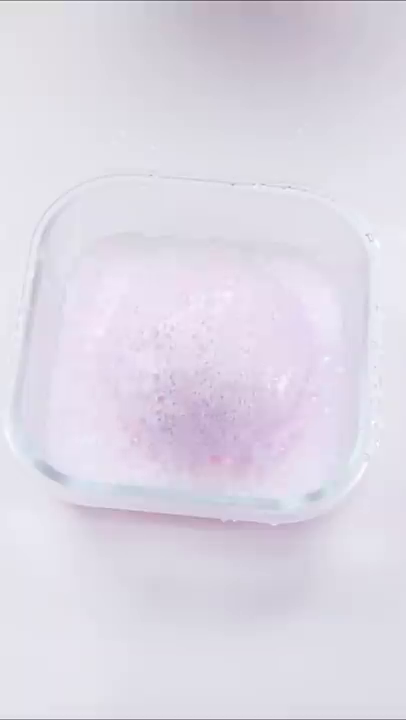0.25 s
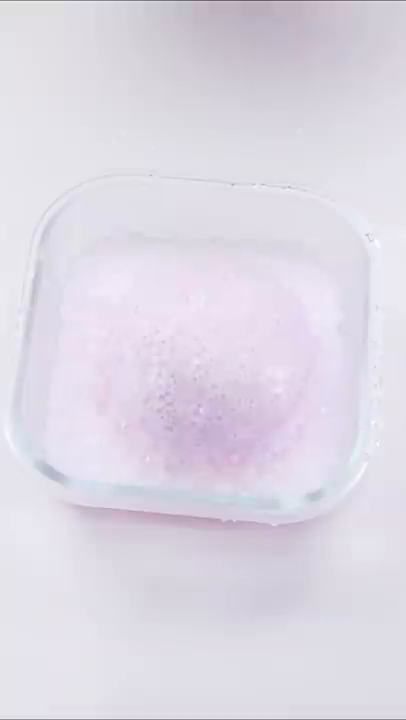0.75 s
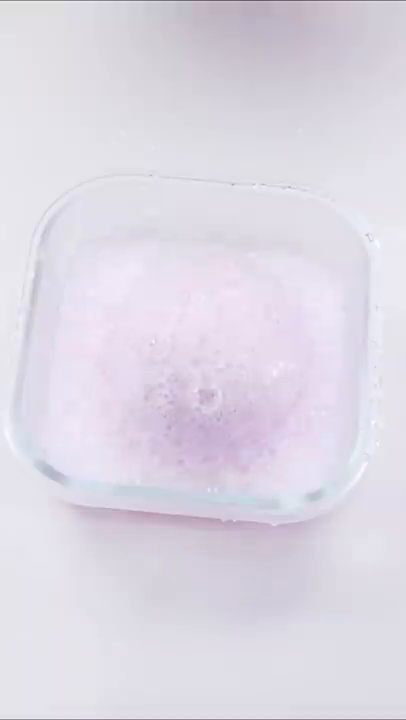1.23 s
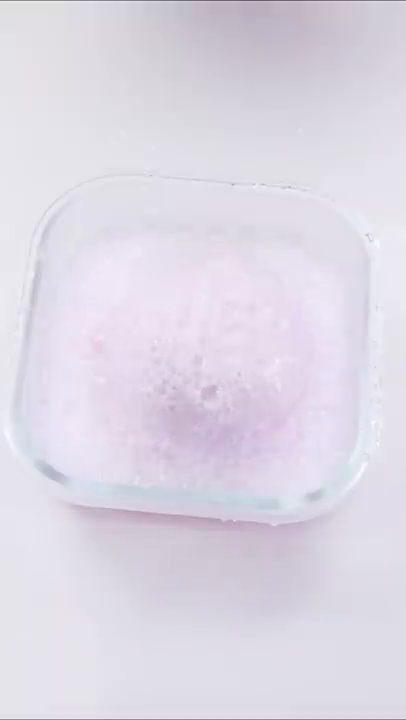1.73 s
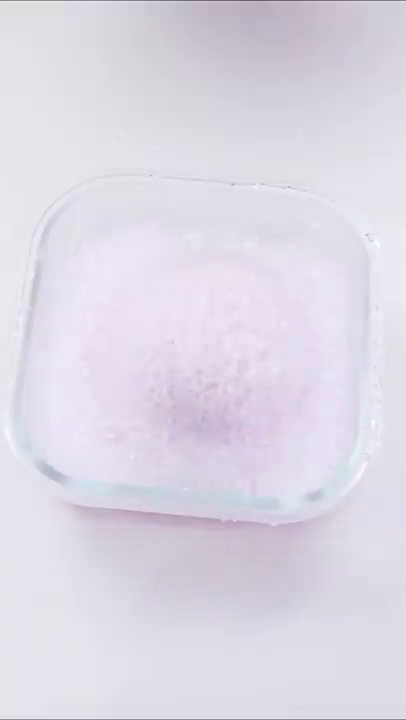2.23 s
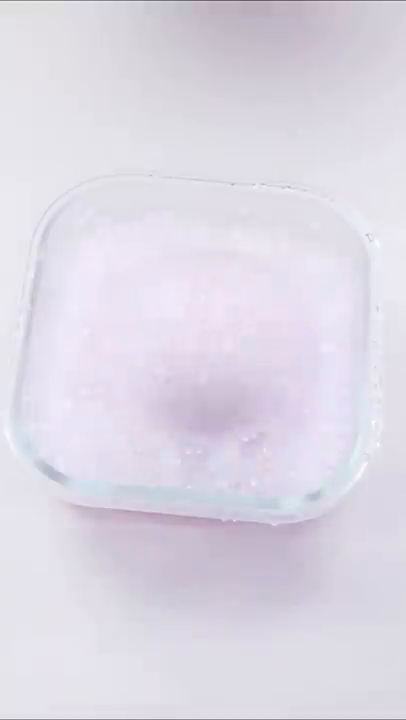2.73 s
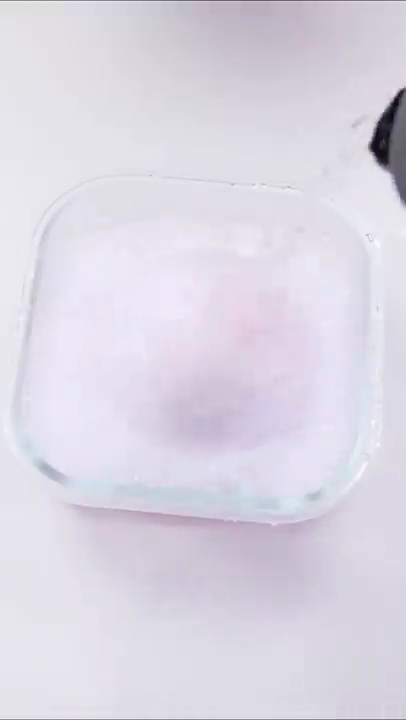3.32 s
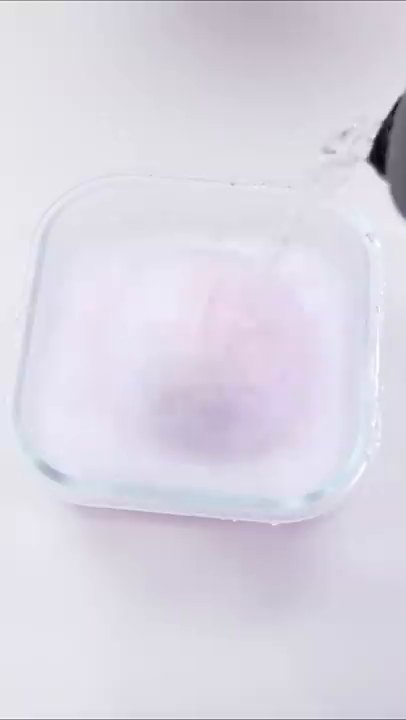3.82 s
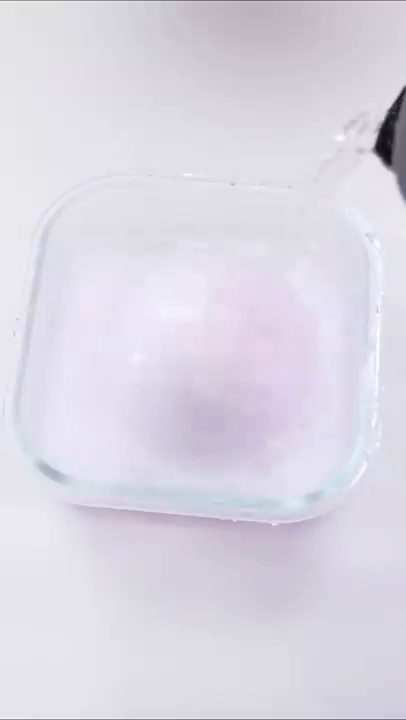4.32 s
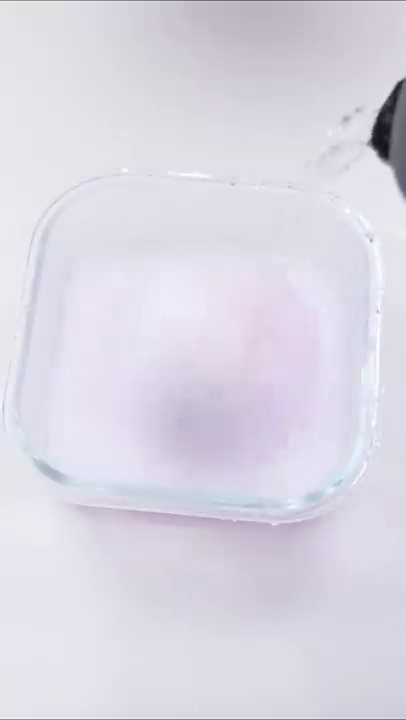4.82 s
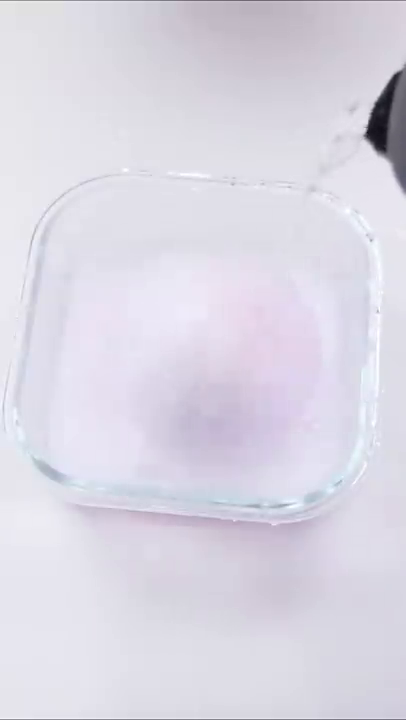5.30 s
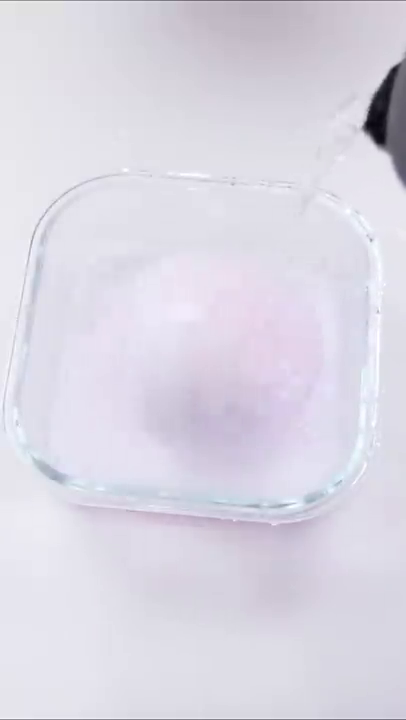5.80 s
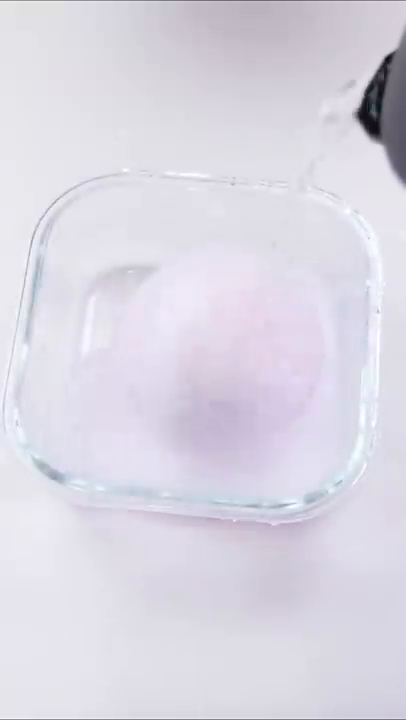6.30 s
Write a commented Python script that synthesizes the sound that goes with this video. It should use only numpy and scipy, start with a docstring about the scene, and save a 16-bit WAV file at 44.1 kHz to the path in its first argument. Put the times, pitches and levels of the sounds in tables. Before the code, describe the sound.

Close, bright, steady effervescent hiss with fine crackle swelling for three seconds, then a thin stream of water landing and gurgling quietly underneath.

```python
"""A bath bomb fizzes in a glass dish while water is poured over it, heard close up in stereo.
Swarms of tiny bubble bursts make the hiss and the crackling foam, whose voice sinks as it thickens.
Larger bubbles ring as a burble, higher as the stream runs on, over a low churning that gulps as it lands.
A few single pops and soft knocks, made of decaying tones, stand above a faint rumble of filtered noise."""
import sys
import numpy as np
from scipy import signal
from scipy.fft import rfft, irfft
from scipy.io import wavfile
from scipy.ndimage import uniform_filter1d

SR = 44100
rng = np.random.default_rng(int(sys.argv[2]) if len(sys.argv) > 2 else 0)


def write(x):
    x = np.atleast_2d(x).T
    wavfile.write(sys.argv[1], SR, np.round(np.clip(x, -1, 1) * 32767).astype(np.int16))


N = 288850
FRAME_S = np.arange(N // 256 + 8) * 256 / SR
BIN_HZ = np.fft.rfftfreq(1024, 1 / SR)[:, None]

# relative spectrum of the finest bubbles' hiss: freq_hz, density_db (dB per Hz)
FIZZ_SPECTRUM = [(900, -27.5), (1500, -20), (2200, -12), (3200, -5.5), (4100, -7.5), (5600, -5.5),
                 (6600, -6.5), (7400, -0.6), (8300, -1.5), (9300, 0.4), (10300, -2.2), (12000, -2),
                 (13500, -4), (15700, -10)]
# relative colour of the foam in the dish: freq_hz, density_db (dB per Hz)
FOAM_SPECTRUM = [(2000, -7.5), (3000, -2.5), (4000, 0), (4800, -2.3), (5700, -0.5), (6700, -1.5),
                 (8000, 1.9), (11000, -9), (15000, -18)]
# relative colour of the water in the dish: freq_hz, density_db (dB per Hz)
WATER_SPECTRUM = [(100, -28), (235, -14.5), (300, -15.5), (380, -5.5), (500, -2.5), (750, -0.6),
                  (850, -0.8), (1150, 1.4), (1500, -5), (2000, -5), (3000, -26), (6000, -40)]
# relative colour of the churning: freq_hz, density_db (dB per Hz)
CHURN_SPECTRUM = [(40.0, -13.5), (70, -5), (100, -1.5), (150, -6), (230, -1.5), (300, -2.5), (380, 4.5),
                  (550, -9), (1000, -35.0)]
# head of foam, building up and then washed down by the stream: time_s, height (0-1)
FOAM_HEIGHT = [(0, 0), (1.1, 0.39), (2.2, 0.77), (3.1, 1), (4.3, 0.69), (5.3, .33), (6.55, 0.2)]
# brief surges of the crackle: centre_s, gain_db, half_length_s
CRACKLE_SURGES = [(2.05, 1.5, .1), (3.098, 2.8, .05), (3.23, 2.5, .035), (5.58, 3, 0.027), (5.83, 2.5, .06)]
# swells as the stream drives air under: centre_s, gain_db, half_length_s, extra_emphasis_db (favoured pitch)
GURGLE_SWELLS = [(3.4, 1.2, 0.63, -0.5), (4.35, 2.6, 0.33, 1.5), (5.35, 4, 0.67, -1)]
# sharp single pops: start_s, peak_db (in the mid), pitch_hz
SINGLE_POPS = [(0.6954, -20, 9290), (2.183, -20, 7610), (2.8414, -23, 8070), (3.2374, -17, 8460),
               (5.5786, -21, 4370)]
# faint knocks and clinks nearby: start_s, level_db, pitch_hz, t60_s
NEARBY_KNOCKS = [(.166, -44, 430, 0.085), (.172, -58, 170, .1), (0.276, -51, 196, 0.12),
                 (.283, -49, 450, .1), (.463, -45, 490, .07), (0.709, -50, 520, .06),
                 (1.374, -47, 1600, .14), (1.379, -47, 1020, .14), (1.94, -61, 130, 0.16),
                 (3.278, -48, 340, .07), (5.885, -51, 220, 0.11)]
# relative spectrum of the room rumble: freq_hz, density_db (dB per Hz)
RUMBLE_SPECTRUM = [(10, -15), (25, -2), (42, 4), (52, -15), (80, -18), (200, -24), (1000, -45)]
# stereo width of the bubble swarms: freq_hz, side_minus_mid_db
SWARM_WIDTH = [(30.0, -12.8), (70, -9), (300, -16.5), (700, -15.9), (1150, -12.6), (1500, -6.5),
               (2100, -3.5), (2550, -6.5), (3400, -1.6), (4200, 0.5), (5000, 0.4), (6200, 1), (7800, -0.5),
               (15000, -0.7)]

# the stream lands in the dish and takes a moment to reach full flow
POUR_S, POUR_RISE_S = 3.18, 0.2
# hiss: level with no foam, gain under a full head, share of that gain left under the stream, lift from the stream
FIZZ_DB, FIZZ_HEAD_DB, FIZZ_WET_SHARE, FIZZ_POUR_DB = -33, 3.5, 0.2, 1.5
# the reaction is still picking up at first: starting offset, time constant of its fading
START_DB, START_S = -0.9, 0.4
# crackle: level of a full head, amplitude share left with no foam, damping by the stream
FOAM_DB, FOAM_THIN, FOAM_POUR_DB = -33.6, 0.25, -1.07
# the foam's largest bubbles grow and sink in pitch until they are ripe; then the stream breaks them up
FOAM_START_HZ, GROW_OCT_PER_S, RIPE_S, BREAK_OCT_PER_S = 8900, 0.6, 3.65, 0.13
# burbling: level in calm water, favoured pitch in open water, its drop under a full head
BURBLE_DB, BURBLE_HZ, BURBLE_DROP_OCT = -48.5, 1205, 1.56
# emphasis of the favoured pitch: in open water, added under a full head
CROWD_DB, CROWD_HEAD_DB = 1.8, 3.5
# churning: level with no foam, gain under a full head, level of the stream's own churning
CHURN_DB, CHURN_HEAD_DB, CHURN_POUR_DB = -78, 18.5, -65.5
# its pitch in open water, rise under a full head, sinking as the dish fills
CHURN_HZ, CHURN_HEAD_OCT, FILL_OCT_PER_S = 200, 0.55, 0.25
# the gulp of the stream's first landing: centre, half length, gain, drop in pitch
GULP_S, GULP_HALF_S, GULP_DB, GULP_OCT = 3.23, 0.11, 3.5, 0.69
# room rumble: settled level, starting offset, time it takes to build, side relative to mid
RUMBLE_DB, RUMBLE_START_DB, RUMBLE_RISE_S, RUMBLE_SIDE_DB = -72.3, -7, 2.5, -12
# left minus right; upper edge of the whole sound
BALANCE_DB, EDGE_HZ = 0.2, 15800


def fizz():
    """Tiny gas bubbles burst in vast numbers: louder as the foam builds, steadier under the stream."""
    head_db = FIZZ_HEAD_DB * head()
    calm_db = FIZZ_DB + START_DB * np.exp(-FRAME_S / START_S)
    wet_db = FIZZ_POUR_DB + FIZZ_WET_SHARE * head_db
    level_db = calm_db + (1 - flow()) * head_db + flow() * wet_db
    bursts = swarm(2006, 15580, per_s=130000, cycles=4.8, spread_db=1.3, count=28)
    return voiced(bursts, read(FIZZ_SPECTRUM, BIN_HZ), level_db)


def foam():
    """The foam crackles above the pitch of its largest bubbles, and hardly at all below."""
    grown_oct = GROW_OCT_PER_S * np.minimum(FRAME_S, RIPE_S)
    grown_oct -= BREAK_OCT_PER_S * (FRAME_S - RIPE_S).clip(0)
    octaves = np.log2(BIN_HZ.clip(1) / FOAM_START_HZ) + grown_oct
    # steep cut below the largest bubbles, gentle fall above
    sizes_db = -10 * np.log10(1 + 2 ** (-10.5 * octaves)) - 3 * octaves.clip(0)
    thickness = FOAM_THIN + (1 - FOAM_THIN) * head()
    level_db = FOAM_DB + 20 * np.log10(thickness) + FOAM_POUR_DB * flow()
    level_db += sum(db * hump(s, half_s) for s, db, half_s in CRACKLE_SURGES)
    bursts = swarm(1803, 13060, per_s=22000, cycles=9.3, spread_db=2.0, count=28)
    return voiced(bursts, read(FOAM_SPECTRUM, BIN_HZ) + sizes_db, level_db)


def burble():
    """Larger bubbles ring in the water, crowding round one pitch that is lower under more foam."""
    favoured_hz = BURBLE_HZ * 2 ** (-BURBLE_DROP_OCT * head())
    crowd = np.exp(-(np.log2(BIN_HZ.clip(1) / favoured_hz) / 0.74) ** 2)
    emphasis_db = CROWD_DB + CROWD_HEAD_DB * head()
    level_db = np.full_like(FRAME_S, BURBLE_DB)
    for s, db, half_s, extra_db in GURGLE_SWELLS:
        swell = hump(s, half_s)
        emphasis_db += swell * extra_db
        level_db += swell * db
    rings = swarm(229.7, 2566, per_s=9000, cycles=3.25, spread_db=1.3)
    return voiced(rings, read(WATER_SPECTRUM, BIN_HZ) + emphasis_db * crowd, level_db)


def plunge():
    """Pockets of air wobble under the foam: a low flutter that gulps as the stream lands, then deepens."""
    gulp = hump(GULP_S, GULP_HALF_S)
    filled_oct = FILL_OCT_PER_S * (FRAME_S - POUR_S).clip(0)
    centre_hz = CHURN_HZ * 2 ** (CHURN_HEAD_OCT * head() - filled_oct - GULP_OCT * gulp)
    sizes_db = -5 * np.log2(BIN_HZ.clip(1) / centre_hz) ** 2
    under_foam = gain_of(CHURN_DB + CHURN_HEAD_DB * head())
    under_stream = gain_of(CHURN_POUR_DB) * flow()
    level_db = 20 * np.log10(np.hypot(under_foam, under_stream)) + GULP_DB * gulp
    pockets = swarm(68.0, 495, per_s=500, cycles=1.46, spread_db=1.5, count=8)
    return voiced(pockets, read(CHURN_SPECTRUM, BIN_HZ) + sizes_db, level_db)


def pops():
    """Single bubbles ring out of the swarm as short decaying tones, a little off centre."""
    out = np.zeros(N)
    for s, db, hz in SINGLE_POPS:
        # 1 dB makes up for the decay before the first crest
        add(out, s, gain_of(db + 1.0) * bubble(hz, 2.4, 0.03))
    return np.array([out, 0.4 * out])


def knocks():
    """Each knock is a briefly ringing tone, smeared by the room into noise round its pitch."""
    out = np.zeros((2, N))
    t = np.arange(SR // 5) / SR
    for s, db, hz, t60 in NEARBY_KNOCKS:
        for channel, direct in zip(out, (1, 0.2)):  # mid, side
            noise = rng.standard_normal(len(t))
            smear = evened(signal.fftconvolve(noise, bubble(hz, 3.3, 0))[:len(t)])
            ring = direct * np.sin(2 * np.pi * hz * t) + 0.53 * smear
            add(channel, s, gain_of(db - 60 * t / t60) * ring)
    return out


def rumble():
    """Low noise of the room, building up and then holding."""
    hz = np.fft.rfftfreq(N, 1 / SR)
    z = rfft(rng.standard_normal((2, N))) * gain_of(read(RUMBLE_SPECTRUM, hz))
    still_missing = (1 - (np.arange(N) / SR / RUMBLE_RISE_S) ** 2).clip(0)
    level_db = RUMBLE_DB + RUMBLE_START_DB * still_missing
    return evened(irfft(z, N)) * gain_of(level_db) * gain_of([[0], [RUMBLE_SIDE_DB]])


def head():
    """Height of the foam per frame."""
    return follow(FOAM_HEIGHT, FRAME_S)[0].clip(0)


def flow():
    """Flow of the stream per frame, 0-1."""
    return np.clip((FRAME_S - POUR_S) / POUR_RISE_S, 0, 1)


def hump(s, half_s):
    """A smooth rise and fall around time s, 0-1 per frame."""
    return np.exp(-((FRAME_S - s) / half_s) ** 2)


def bubble(hz, cycles, rise):
    """A bubble falls to 1/e over some cycles, its pitch rising by a share as it nears the surface."""
    age = np.arange(int(5 * cycles * SR / hz) + 4) * hz / (cycles * SR)  # in decay times
    return np.exp(-age) * np.sin(2 * np.pi * cycles * (age + rise * age ** 2 / 2))


def swarm(low_hz, high_hz, per_s, cycles, spread_db, count=20):
    """Bubbles of many sizes born at random moments: (mid, side), with an even spectrum."""
    out = np.zeros((2, N))
    for hz in np.geomspace(low_hz, high_hz, count):
        born = rng.random((2, N), dtype=np.float32) < per_s / count / SR
        sizes = np.minimum(rng.standard_exponential((2, N), dtype=np.float32)[born], 4)
        births = np.zeros((2, N))
        births[born] = gain_of(spread_db * sizes) * (-1) ** np.arange(born.sum())  # alternating sign
        rings = signal.oaconvolve(births, bubble(hz, cycles, 0.039)[None], axes=1)[:, :N]
        out += np.sqrt(hz) * evened(rings)
    return out


def voiced(pair, colour_db, level_db):
    """Flattens a (mid, side) pair, then gives it a colour, a level per frame and a stereo width."""
    z = signal.stft(pair, nperseg=1024, noverlap=768)[2]
    power = (abs(z) ** 2).mean((0, 2))
    z /= np.sqrt(uniform_filter1d(power, size=9))[:, None] + 1e-9
    colour = gain_of(colour_db + np.zeros_like(FRAME_S))
    colour *= gain_of(level_db) / np.sqrt(np.mean(colour ** 2, axis=0))
    z *= colour[:, :z.shape[2]] * np.sqrt(3 / 2 / 1024)  # window scaling, so the level is rms
    z[1] *= gain_of(read(SWARM_WIDTH, BIN_HZ))
    return signal.istft(z, nperseg=1024, noverlap=768)[1][:, :N]


def gain_of(db):
    """Decibels to amplitude."""
    return 10 ** (np.asarray(db) / 20)


def evened(x):
    """Scales to rms 1."""
    return x / np.sqrt(np.mean(x ** 2) + 1e-20)


def read(points, hz):
    """A spectrum table on a log-frequency axis."""
    f, value = np.transpose(points)
    return np.interp(np.log(hz + 1), np.log(f + 1), value)


def follow(rows, t):
    """The columns of a curve at times t."""
    s, *columns = np.transpose(rows)
    return [np.interp(t, s, c) for c in columns]


def add(mix, s, sound):
    """Mixes a sound in at time s."""
    part = mix[max(round(s * SR), 0):][:len(sound)]
    part += sound[:len(part)]


def scene():
    """All layers, spread from mid and side to left and right."""
    mid, side = fizz() + foam() + burble() + plunge() + pops() + knocks() + rumble()
    pair = np.array([mid + side, mid - side])
    # each side also hears the other half a millisecond late, which ripples the hiss
    echo = np.pad(pair[::-1], ((0, 0), (round(0.00051 * SR), 0)))[:, :N]
    return (pair + 0.067 * echo) * gain_of([[BALANCE_DB / 2], [-BALANCE_DB / 2]])


def record(dry):
    """A steep low-pass takes away the treble above the upper edge."""
    lowpass = signal.firwin(511, EDGE_HZ, window=("kaiser", 9), fs=SR)
    return signal.oaconvolve(dry, lowpass[None], "same")


dry = scene()
out = record(dry)
write(out)
```